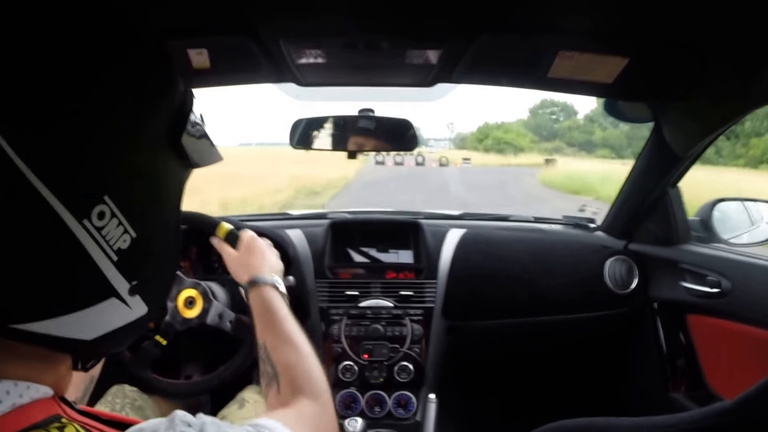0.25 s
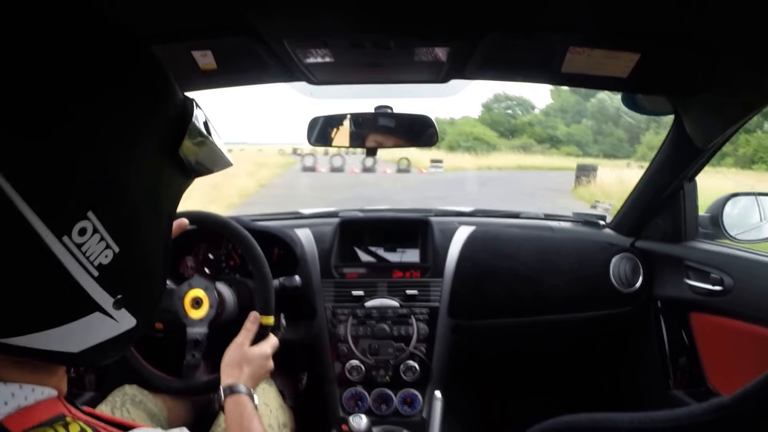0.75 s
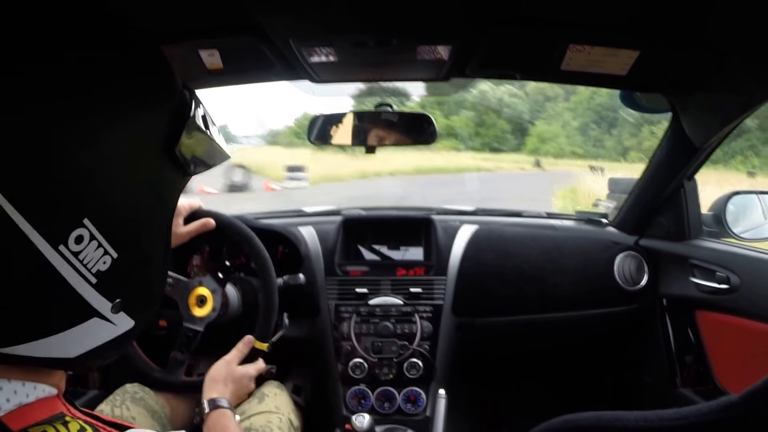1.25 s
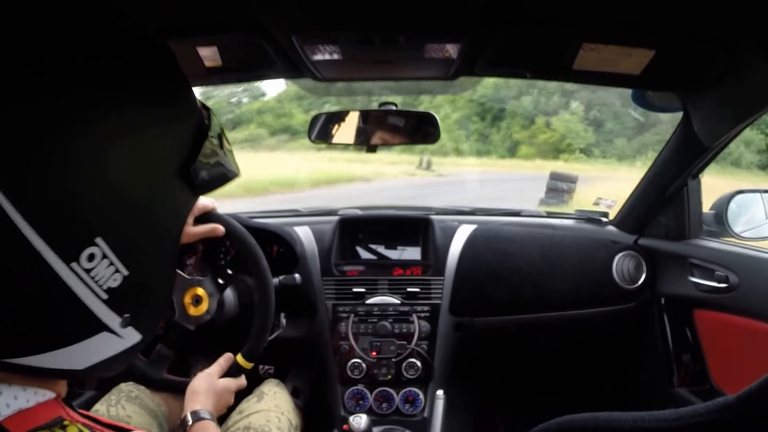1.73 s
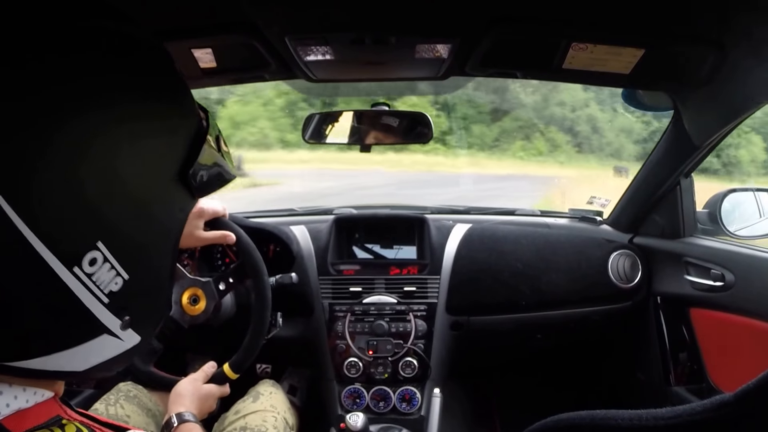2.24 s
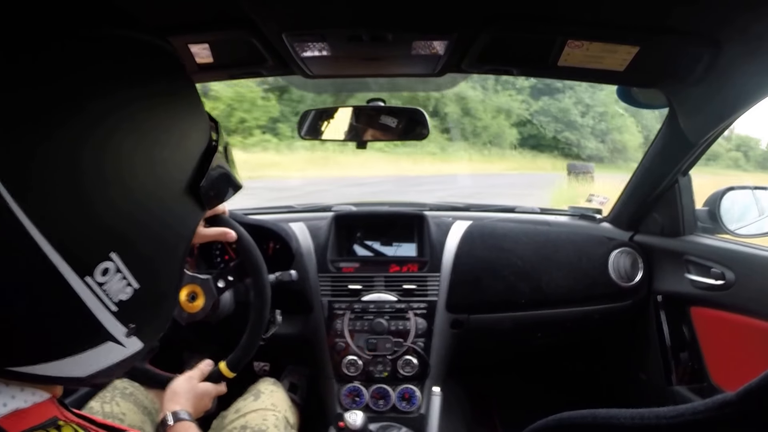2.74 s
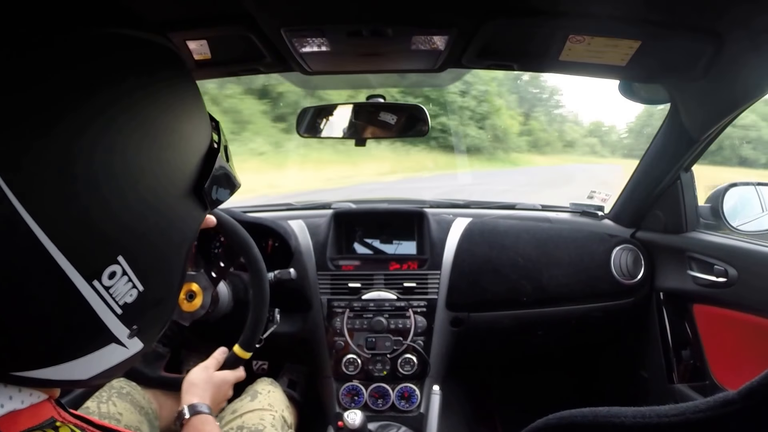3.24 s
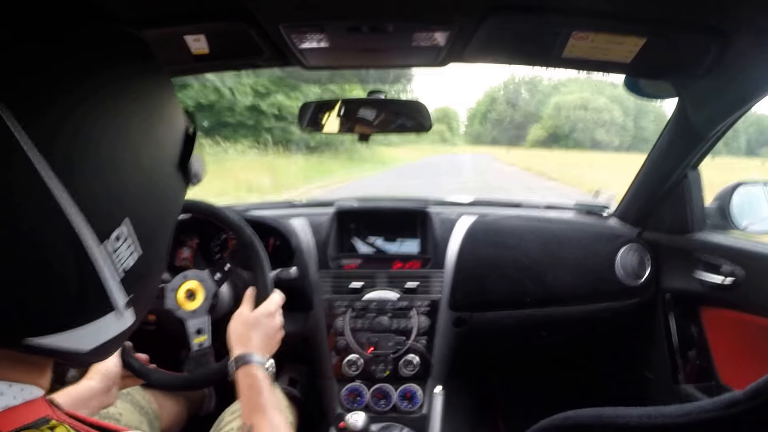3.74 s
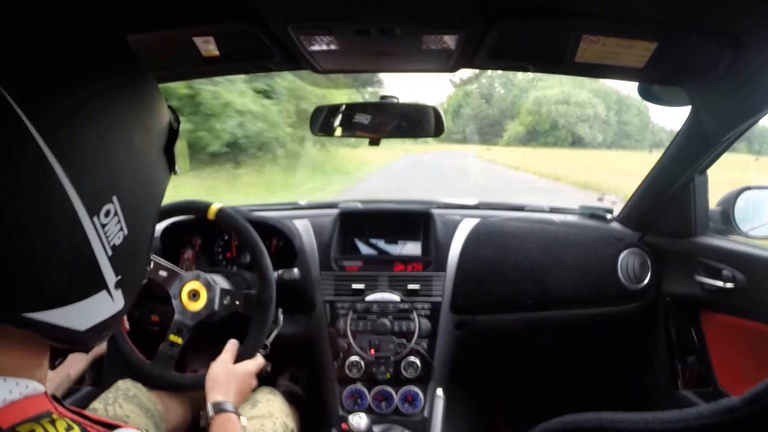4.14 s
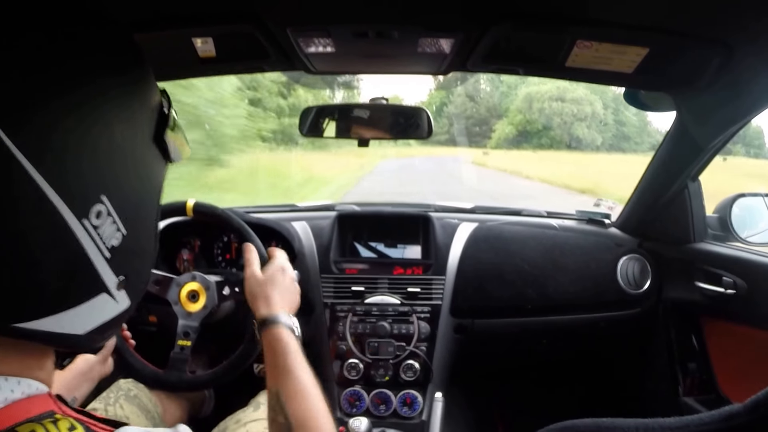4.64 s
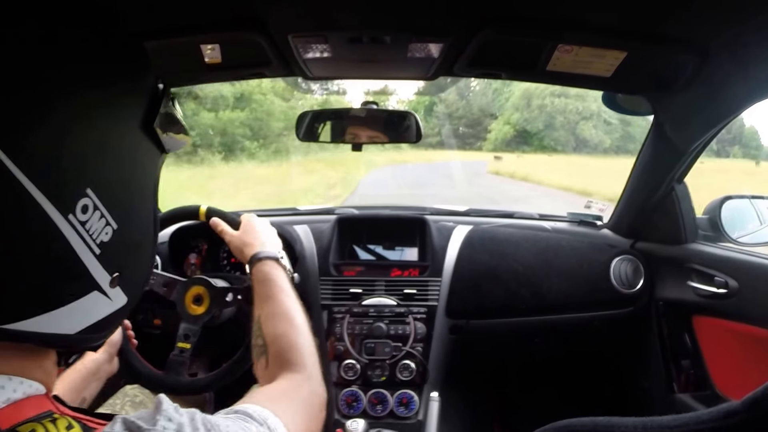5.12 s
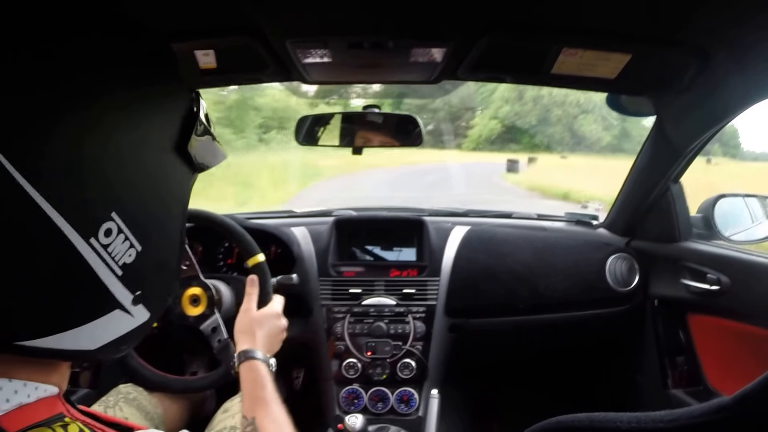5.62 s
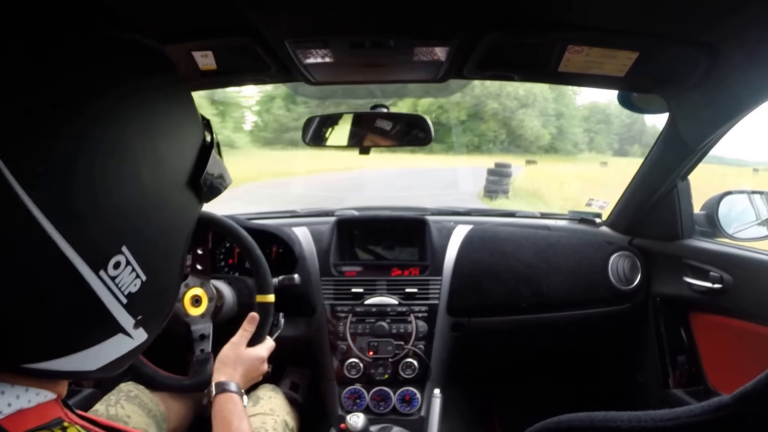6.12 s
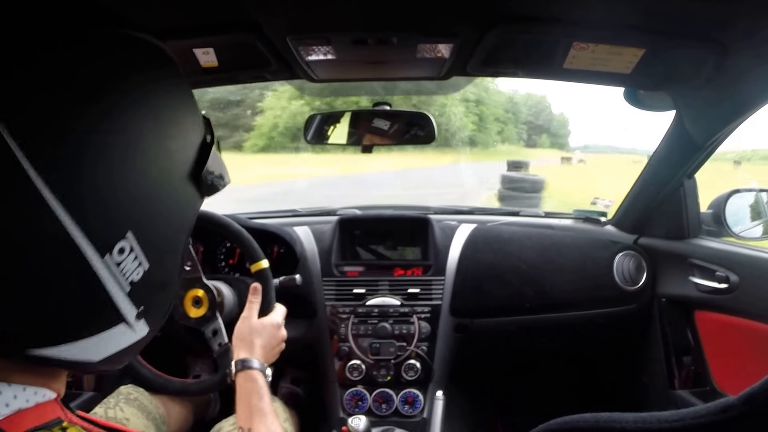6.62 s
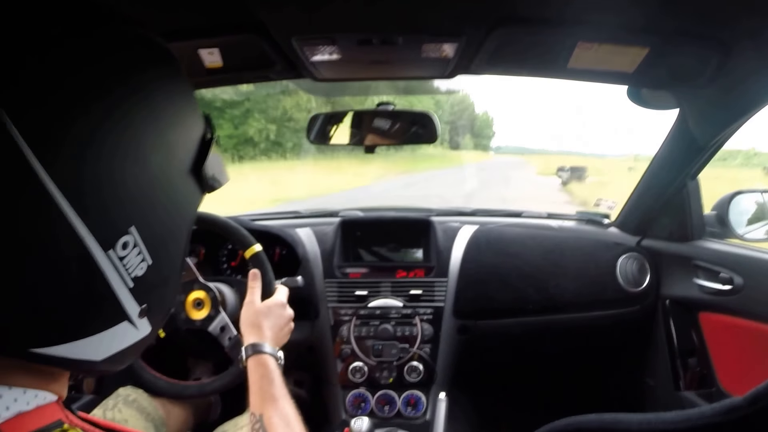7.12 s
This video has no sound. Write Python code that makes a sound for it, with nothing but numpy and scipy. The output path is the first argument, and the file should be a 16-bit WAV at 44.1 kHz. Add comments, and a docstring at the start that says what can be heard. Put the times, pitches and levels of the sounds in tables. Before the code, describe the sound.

Inside a car on a track, a smooth, buzzing engine drone sinks slightly and burbles through a corner while a loose part knocks and plastic trim rattles. The engine then pulls hard with rushing intake air, drops briefly at a thin whistle, knocks again, and climbs once more. Low road rumble and tyre roar continue throughout, heard from a microphone in the small, dry cabin.

```python
"""Inside a rotary-engined car on a circuit: it rolls through a corner on part throttle, pulls hard,
lifts briefly and pulls again. The exhaust is a stack of sine orders of the firing rate, filtered by pipe
and cabin; the intake is puffing noise. Road rumble and tyre roar are coloured noise, thuds are short sines.
Something loose knocks at the turns of the wheel as decaying modes; trim rattles in noise bursts and squeaks."""
import sys
import numpy as np
from scipy import signal
from scipy.fft import rfft, irfft, next_fast_len
from scipy.io import wavfile
from scipy.ndimage import map_coordinates

SR = 44100
rng = np.random.default_rng(int(sys.argv[2]) if len(sys.argv) > 2 else 0)


def wav_out(sig):
    """Save sig, one row per channel (or a flat mono array), as 16-bit PCM at SR to the path in sys.argv[1]."""
    wavfile.write(sys.argv[1], SR, np.round(np.clip(np.atleast_2d(sig).T, -1, 1) * 32767).astype(np.int16))


N = 325017


def amp(db):
    """Decibels to gain."""
    return 10 ** (np.asarray(db) / 20)


def unit(x):
    """Scale to rms 1."""
    return x / np.sqrt(np.mean(x ** 2) + 1e-20)


def along(points, hz):
    """Read (frequency [Hz], value) points on a log frequency axis."""
    f, v = np.transpose(points)
    return np.interp(np.log(hz + 1), np.log(f + 1), v)


def humps(peaks, hz):
    """Gain in dB of (centre [Hz], width [Hz], level [dB]) resonances."""
    return sum(db / (1 + (2 * (hz - centre) / width) ** 2) for centre, width, db in peaks)


def curves(rows):
    """One value per sample for each column after the time."""
    s, *cols = np.transpose(rows)
    return [np.interp(np.arange(N) / SR, s, c) for c in cols]


def held(start, end, rise, fall):
    """An envelope from 0 to 1 that rises at start and falls at end, all in seconds."""
    t = np.arange(N) / SR
    return np.clip((t - start) / rise, 0, 1) * np.clip(1 - (t - end) / fall, 0, 1)


def swells(rows, length):
    """A curve in dB with a short rounded peak for each (time [s], level [dB]) row."""
    t = np.arange(N) / SR
    return sum(db * np.exp(-((t - s) / length) ** 2) for s, db in rows)


def wobble(rate):
    """A smooth random curve, rate knots a second."""
    steps = np.arange(0, N + 32, 32)
    coarse = map_coordinates(rng.standard_normal(4096), [steps * rate / SR], mode="wrap")
    return np.interp(np.arange(N), steps, coarse)


def filtered(x, response):
    """Filter x by a gain that is a function of frequency."""
    m = next_fast_len(len(x) + 8192)
    return irfft(rfft(x, m) * response(np.fft.rfftfreq(m, 1 / SR)), m)[:len(x)]


def noise(spectrum):
    """Noise of rms 1 with the given colour."""
    return unit(filtered(rng.standard_normal(N), lambda hz: amp(along(spectrum, hz))))


def narrow(centre_hz, width):
    """Noise of rms 1 in one resonance."""
    return unit(filtered(rng.standard_normal(N), lambda hz: 1 / (1 + (2 * (hz - centre_hz) / width) ** 2)))


def add(track, s, sound):
    """Mix a short sound into the track at s seconds."""
    part = track[max(round(s * SR), 0):][:len(sound)]
    part += sound[:len(part)]


# presses of the throttle: (down [s], up [s], time to press [s], engine load [dB], throttle whine [dB])
PRESSES = [(-.1, 3.2, 0.054, -10, -73), (.08, 0.332, 0.31, -2.5, -72), (1.078, 1.19, 0.13, 5, -42),
           (1.2, 1.7, 0.049, -6, -68), (2.2, 2.74, 0.11, -3.5, -58), (2.8, 5.24, 0.31, 0.5, -57.5),
           (6.018, 7.41, 0.075, -0.54, -64)]
COAST_DB, COAST_WHINE_DB = -14.5, -81  # load and whine with the throttle shut


def throttle(release):
    """Engine load and throttle whine in dB; both rise with each press and fall over release seconds."""
    load_db, whine_db = COAST_DB, COAST_WHINE_DB
    for down, up, rise, press_db, sing_db in PRESSES:
        pedal = held(down, up, rise, release)
        load_db = np.maximum(load_db, COAST_DB + pedal * (press_db - COAST_DB))
        whine_db = np.maximum(whine_db, COAST_WHINE_DB + pedal * (sing_db - COAST_WHINE_DB))
    return load_db, whine_db


# upper orders as they reach the cabin: (frequency [Hz], level [dB])
PIPE = [(280, 1.5), (450, -3), (620, -0.5), (770, -5.5), (860, -6), (1000, -8), (1150, -9), (1280, -17.5),
        (1400, -17), (1650, -18.5), (1850, -25), (2200, -19.5), (3600, -49)]
# lines halfway between the orders, relative to them: (frequency [Hz], level [dB])
HALFWAY = [(540, -9), (600, -5), (660, -11), (780, -13), (900, -8), (1380, -4.5), (1520, -7), (1750, -4.5)]
# narrow cabin resonances that the upper orders sweep through: (centre [Hz], width [Hz], level [dB])
CABIN_PEAKS = [(601, 34, 8), (687, 17, 3.5), (703, 18, -4), (753.5, 16, 7.5), (798.8, 14, 7.5),
               (840, 23, -6), (900, 38, 1), (1040, 28, -1), (1060, 30, 2.5), (1122, 15, 1), (1206, 74, 6.5),
               (1396, 40, 1.5), (1510, 49, 8.5), (1592, 55, 7.5), (1735, 40, 0)]
# the lowest note drops and breaks up partway through the first pull:
# (start [s], end [s], onset [s], recovery [s])
FALTER = (3.59, 4.08, 0.022, 0.17)
FALTER_DB = -2


def exhaust(firing_hz, phase, boom_db, second_db, rasp_db):
    """Orders of the firing rate; the two rotors fire unequally, which puts lines halfway between them."""
    # on a light throttle the chambers burn unevenly and the note stumbles
    stumble = np.clip((-41 - rasp_db) / 7, 0, 1)
    phase = phase + (0.04 + 0.22 * stumble) * wobble(24)

    falter = held(*FALTER)
    flutter_db = (0.8 + 2 * stumble + 2.5 * falter) * wobble(30)
    note = amp(boom_db + FALTER_DB * falter + flutter_db) * np.sin(phase + 1.1 * falter * wobble(32))
    note += amp(second_db + 2 * wobble(24)) * np.sin(2 * phase + 0.22 * wobble(25))

    rasp = np.zeros(N)
    for order in [1.5, *np.arange(2.5, 12.5, 0.5)]:
        hz = order * firing_hz
        path_db = along(PIPE, hz) + humps(CABIN_PEAKS, hz)
        # the halfway lines are weak, except as they pass a pipe resonance
        unequal_db = (order % 1 > 0) * along(HALFWAY, hz)
        # each order swells and flutters with the combustion
        swell_db = 1.8 * wobble(6) + 2.4 * wobble(16) + 1.1 * wobble(60)
        waver = 0.24 * wobble(16) + 0.08 * wobble(70)
        tone = np.sin(order * phase + waver + rng.uniform(0, 2 * np.pi))
        rasp += amp(path_db + unequal_db + swell_db) * tone
    # a rotor has three faces, so the pattern of strong and weak firings repeats every six
    faces = 1 + 0.16 * wobble(4) * np.sin(phase / 6) + 0.22 * wobble(4) * np.sin(phase / 3)
    return np.sqrt(2) * (note + amp(rasp_db) * rasp * faces)


# part throttle through the corner: (start [s], end [s], rise [s], fall [s])
BURBLE = (0.7, 3.2, 0.84, 0.31)
# levels of orders 0.5, 1.5 and 2 before the throttle scales them: (level [dB], one per order)
BURBLE_DB = (-28.5, -33.5, -37.5)


def burble(phase, load_db):
    """On part throttle the two rotors burn unequally and throb around the low orders."""
    throb = np.zeros(N)
    for order, db in zip((0.5, 1.5, 2), BURBLE_DB):
        throb += amp(db + 3.5 * wobble(16)) * np.sin(order * phase + 0.45 * wobble(16))
    light = np.clip(load_db / COAST_DB, 0.3, 1) * held(*BURBLE)
    return light * throb


# colour of the exhaust turbulence: (frequency [Hz], level per Hz [dB])
GAS = [(350, -11), (700, -4), (1250, -4.5), (1600, -10.5), (2400, -18), (5000, -33)]
GAS_DB = -9  # relative to the upper orders


def combustion(phase, rasp_db):
    """Turbulent gas leaves the ports in rough puffs around the upper orders."""
    beat = 1 + 0.8 * np.sin(phase) + 0.5 * np.sin(phase / 2)
    puffs = unit(beat * amp(2 * wobble(60)))
    return amp(rasp_db + GAS_DB) * puffs * noise(GAS)


# colour of the rushing air: (frequency [Hz], level per Hz [dB])
INTAKE = [(400, 14.5), (1200, 2), (2200, 6.5), (3300, 5.5), (4700, 4), (5800, 5), (6500, 1.5), (8200, -1.5),
          (10200, -1.5), (12000, -6.5), (15000, -19)]
# resonances and notches of the intake duct: (centre [Hz], width [Hz], level [dB])
DUCT = [(3705, 120, 2.5), (4294, 100, 3.5), (5260, 120, 0.5), (6050, 250, -4), (7550, 200, 4.5),
        (8950, 400, 0.5), (9450, 300, 3), (10500, 500, 1.5)]


def intake(phase, rush_db):
    """Air rushes in puffs, one for each firing; a stronger flow is brighter."""
    puffs = unit(1 + 0.065 * np.sin(phase) + 0.14 * np.sin(phase / 2))
    air = unit(filtered(noise(INTAKE), lambda hz: amp(humps(DUCT, hz))))
    # a weak flow loses part of its treble
    fizz = filtered(air, lambda hz: along([(7000, 0.69), (13000, 0.55)], hz))
    dullness = np.clip((-37 - rush_db) / 20, 0, 0.8)
    return amp(rush_db + 0.17 * wobble(25)) * puffs * (air - dullness * fizz)


SPELL_EDGE_S = 0.023


def spells(rows):
    """A gain that opens for each (start [s], end [s], level [dB]) row."""
    return sum(amp(db) * held(start, end, SPELL_EDGE_S, SPELL_EDGE_S) for start, end, db in rows)


MID_RATE_HZ = 243.3  # the firing rate around which levels and whine pitch are set
WHINE_HZ, WHINE_CLIMB = 6390, 0.62  # pitch at the mid rate; the power of engine speed by which it climbs
# spells of a hoarse grinding: (start [s], end [s], level [dB])
GRINDS = [(1.17, 3.1, -57.5), (2.1, 2.4, -65)]
# spells of a thin squeal in the corner: (start [s], end [s], level [dB])
SQUEALS = [(1.17, 1.72, -61), (1.29, 1.37, -63), (1.93, 2.68, -59)]
# spells of a high sizzle: (start [s], end [s], level [dB])
SIZZLES = [(1.05, 9.4, -73), (1.28, 1.35, -73), (1.66, 2.24, -72)]


def whines(firing_hz, whine_db):
    """Air whines past the throttle, higher with engine speed; grind, squeal and sizzle are narrow noise."""
    turn = 2 * np.pi * np.cumsum(WHINE_HZ * (firing_hz / MID_RATE_HZ) ** WHINE_CLIMB) / SR
    # two randomly swelling halves make the tone hoarse
    whine = wobble(520) * np.sin(turn + wobble(300))
    whine += wobble(520) * np.cos(turn + wobble(300))
    grind = narrow(centre_hz=2600, width=320)
    squeal = amp(1.5 * wobble(12) + 2 * wobble(40)) * narrow(centre_hz=5080, width=320)
    sizzle = amp(wobble(14) + 1.8 * wobble(50)) * narrow(centre_hz=10470, width=430)
    corner = spells(GRINDS) * grind + spells(SQUEALS) * squeal
    return amp(whine_db) * whine + corner + spells(SIZZLES) * sizzle


def lift_whistle(start, hold, pitch_hz, first_db):
    """A thin, breaking whistle of air as the throttle shuts, on its first and third partials."""
    t = np.arange(N) / SR - start
    breaking = (0.18 + 0.4 * np.exp(-np.abs(t) / 0.03)) * wobble(500)
    turn = 2 * np.pi * pitch_hz * t + breaking
    tone = np.sin(3 * turn) + amp(first_db) * np.sin(turn)
    # after the hold it dies at 148 dB a second
    return (t > 0) * amp(-47.5 - 148 * np.maximum(t - hold, 0) + 2 * wobble(200)) * tone


# a loose part knocking and falling back: (time [s], level [dB])
KNOCKS = [(0.4056, -28), (0.527, -25), (0.6716, -23), (.7698, -14.5), (0.8072, -23.5), (0.976, -17.5),
          (1.01, -21.5), (1.145, -23), (1.462, -23), (1.483, -25.5), (1.805, -30), (5.59, -21),
          (5.8255, -17), (5.852, -26), (5.868, -32), (5.9998, -16.5), (6.02, -22.5), (6.178, -15.5),
          (6.193, -25), (6.212, -39)]
# its well damped modes: (frequency [Hz], level [dB], t60 [s])
KNOCK_MODES = [(816, -11, 0.066), (1050, -1, 0.012), (1220, -2.5, 0.045), (1323, -2, 0.04),
               (1600, -9, 0.016), (1820, -10, 0.017), (2660, -17, 0.033), (3350, -16, 0.024),
               (3570, -28, 0.015), (4780, -25, .015)]
# colour of the trim, for scrapes and rattles: (frequency [Hz], level per Hz [dB])
TRIM = [(300, 16), (900, 13.5), (1700, 10), (2300, 11), (3300, 6.5), (5500, 3), (7500, -2.5),
        (11500, -10.5), (15000, -21)]
# colour of the rough clack: (frequency [Hz], level per Hz [dB])
CLACK = [(300, -16), (780, 9), (1300, 19), (1750, 11), (2300, 2), (3200, -8), (5500, -22), (9000, -31),
         (15000, -42)]
TOUCH_S, TOUCH_DB = 0.0059, -8  # the part touches lightly just before each blow
SCRAPE_DB, SCRAPE_T60_S = -20, 0.076  # the scrape of that touch, relative to the knock
CLACK_DB, CLACK_T60_S = -10, 0.12  # the rough tail of the blow, relative to the knock


def knocks():
    """A light scraping touch, then the blow proper, rings the loose part; a rough clack dies away after it."""
    out, t = np.zeros(N), np.arange(SR // 8) / SR
    for s, db in KNOCKS:
        for lead, share_db in ((TOUCH_S, TOUCH_DB), (0.0011, 0)):
            # each contact detunes the modes and varies their levels in dB
            chance = rng.standard_normal((len(KNOCK_MODES), 2)) * [0.008, 1.3]
            ring = np.zeros(len(t))
            for k, ((hz, level, t60), (detune, vary)) in enumerate(zip(KNOCK_MODES, chance)):
                decay = amp(level + vary - 60 * t / t60)
                ring += (-1) ** k * decay * np.sin(2 * np.pi * hz * (1 + detune) * t)
            add(out, s - lead, amp(db + share_db) * ring)
        scrape = unit(filtered(rng.standard_normal(len(t)), lambda hz: amp(along(TRIM, hz))))
        clack = unit(filtered(rng.standard_normal(len(t)), lambda hz: amp(along(CLACK, hz))))
        add(out, s - TOUCH_S, amp(db + SCRAPE_DB - 60 * t / SCRAPE_T60_S) * scrape)
        # the tail builds up as the first ring fades
        build_up = 1 - np.exp(-t / 0.0024)
        add(out, s, amp(db + CLACK_DB - 60 * t / CLACK_T60_S) * build_up * clack)
    return out


CHATTER_UNTIL_S = 2.3
# every rattle plays 5.5 dB above its listed level, before its decay
CHATTER_DB, CHATTER_TOP_DB, CHATTER_T60_S = -61, 7, 0.07


def faint_rattles(count):
    """Small rattles at chance moments while the car turns into the corner."""
    times = (np.arange(count) + rng.random(count)) * CHATTER_UNTIL_S / count
    return [(s, CHATTER_DB, CHATTER_TOP_DB, CHATTER_T60_S) for s in times]


# trim rattles: (time [s], level before the 5.5 dB lift [dB], top end [dB], t60 [s])
RATTLES = [(.03, -37, -11, 0.1), (.119, -36, -35, 0.089), (.19, -35.5, 4, 0.045), (.281, -28, -22, 0.032),
           (.344, -32, -12, 0.05), (.36, -33.5, 2, 0.11), (.375, -21, 5, 0.06), (.386, -26, -4, 0.043),
           (.529, -27, 6, 0.061), (.561, -42, -1, .05), (.583, -31, 6, 0.053), (.857, -38, -15, .08),
           (1.021, -41, 9, 0.34), (1.067, -31, -5, 0.16), (1.26, -39, 7, 0.058), (1.467, -29.5, 24, 0.024),
           (1.469, -29, -19, 0.058), (1.719, -41.5, 10, 0.074), (1.911, -37, -1, .02),
           (5.37, -31.5, 2, 0.073), (5.489, -37, 14, .031), (5.587, -34, -15, .08),
           (5.605, -35, -11, 0.086), (5.656, -38, 8, 0.07)]


def rattles():
    """Plastic trim chatters in short bursts of tiny contacts."""
    out, t = np.zeros(N), np.arange(SR // 6) / SR
    for s, db, top_db, t60 in [*RATTLES, *faint_rattles(count=5)]:
        contacts = rng.standard_normal(len(t)) * amp(3.2 * rng.standard_normal(len(t)))

        def colour(hz):
            """The trim's spectrum, tilted by this rattle's top end."""
            tilt = along([(3000, 0.041), (9000, 0.3), (12000, 1.0)], hz)
            return amp(along(TRIM, hz) + top_db * tilt)

        chatter = unit(amp(2 * wobble(350)[:len(t)]))
        rise = 1 - np.exp(-45 * t / t60)
        burst = rise * chatter * unit(filtered(contacts, colour))
        add(out, s, amp(db + 5.5 - 60 * t / t60) * burst)
    return out


# trim squeaks, each a double chirp as the part rubs to and fro: (time [s], peak level [dB])
SQUEAKS = [(1.577, -38.5), (2.492, -41), (2.639, -39.5), (3.185, -47), (3.785, -41), (5.494, -38)]
RUB_BACK_S = 0.031


def squeaks(pitch_hz, length, rough):
    """Trim rubs in brief, scratchy, swelling chirps."""
    out, t = np.zeros(N), np.arange(-SR // 50, SR // 50) / SR
    back = [(s + RUB_BACK_S, db) for s, db in SQUEAKS]
    for s, db in [*SQUEAKS, *back]:
        turn = 2 * np.pi * pitch_hz * t + rough * wobble(420)[:len(t)]
        add(out, s + t[0], amp(db) * np.exp(-(t / length) ** 2) * np.sin(turn))
    return out


# the asphalt under the tyres: (time [s], coarseness [dB], unevenness [dB])
SURFACE = [(0, -2, -1.5), (.42, -3, -7.5), (.8, 2, -0.5), (1.25, 2, -2), (1.75, -1.5, 1), (1.95, -3, -4),
           (2.62, 3, 1.5), (2.8, -4, -2), (3.1, -0.5, 1.5), (3.6, -2.5, 3), (4.35, -2.5, -3.5),
           (4.56, -9, -5), (4.8, -7, 0.5), (5.3, -2.5, 1.5), (5.9, 1, 0), (6.35, -1, -1.5), (6.9, 0.5, 2.5),
           (7.37, -1.5, -2)]
# colours of body shake, tyre drone and tyre roar: (frequency [Hz], level per Hz [dB])
SHAKE = [(12, -7), (21, -5), (32, 3.5), (44, -3.5), (56, -2), (72, -12.5), (110, -14.5), (250, -99)]
DRONE = [(50, -20.5), (78, -4), (96, 5.5), (116, -5.5), (160, -4.5), (205, -6.5), (255, -9), (295, -5.5),
         (345, -18.5), (420, -15.5), (600, -36), (1500, -64.5)]
ROAR = [(150, 0), (350, 6), (520, 4.5), (720, 0), (900, 0), (1150, -5), (1550, -6.5), (1900, -13.5),
        (2700, -17), (4000, -20), (6000, -25), (10000, -38.5), (15000, -68)]
# bumps that jolt the body: (time [s], level over the steady shake [dB])
BUMPS = [(.03, 7), (2.28, 5), (2.69, 8.5), (4.34, 7.5), (6.14, 5)]
# air ringing in the tyres and the body panels: (centre [Hz], width [Hz], level [dB])
TYRE_MODES = [(153, 48, 1.5), (215.8, 23, 1), (244, 20, -11), (290, 32, -13)]
# the long corner: (turn-in [s], straightening [s], build-up [s], unwinding [s])
CORNER = (0.21, 2.6, 0.46, 1.29)
SHAKE_DB, DRONE_DB, BUMP_S = -15.5, -19.5, 0.037
ROAR_DB, ROAR_DB_PER_S, ROAR_PER_SURFACE = -34.5, 0.72, 0.38  # at the start; growth; dB per dB of coarseness
SCRUB_DB, STRAIGHT_SCRUB_DB = -27, -38


def road():
    """Bumps shake the body; the tyres drone and roar on the asphalt and ring as they scrub in the corner."""
    t = np.arange(N) / SR
    surface_db, shake_db = curves(SURFACE)
    shake = amp(SHAKE_DB + shake_db + swells(BUMPS, BUMP_S)) * noise(SHAKE)
    drone = amp(DRONE_DB + surface_db + 1.44 * wobble(13)) * noise(DRONE)
    roar_db = ROAR_DB + ROAR_DB_PER_S * t + ROAR_PER_SURFACE * surface_db
    roar = amp(roar_db + 1.2 * wobble(14)) * noise(ROAR)
    scrub_db = STRAIGHT_SCRUB_DB + (SCRUB_DB - STRAIGHT_SCRUB_DB) * held(*CORNER)
    scrub = amp(scrub_db) * sum(amp(db) * narrow(hz, width) for hz, width, db in TYRE_MODES)
    return shake + drone + scrub + roar


# thuds of the road: (time [s], half length [s], peak level [dB])
THUDS = [(1.043, .025, -13), (1.303, 0.022, -10), (1.758, 0.04, -12.5)]


def thuds(pitch_hz):
    """Ridges in the asphalt make the air in the cabin boom briefly."""
    t, out = np.arange(N) / SR, np.zeros(N)
    for s, length, db in THUDS:
        boom = np.sin(2 * np.pi * (pitch_hz * t + rng.random()))
        out += amp(db) * np.exp(-((t - s) / length) ** 2) * boom
    return out


def cabin(x, count, wet):
    """Glass and panels return many weak copies within a few hundredths of a second."""
    delays = rng.uniform(0.001, 0.03, count)
    walls = np.zeros(SR // 30)
    walls[(delays * SR).astype(int)] = rng.choice([-1, 1], count) * np.exp(-delays / 0.0084)
    walls *= wet / np.linalg.norm(walls)
    walls[0] = 1  # the direct sound
    return signal.fftconvolve(x, walls / np.linalg.norm(walls))[:N]


# engine speed: (time [s], firing rate [Hz])
SPEED = [(0, 221), (.28, 223), (.5, 202.9), (.7, 197.6), (1.3, 190.7), (2.2, 187.1), (2.5, 193.8),
         (2.9, 195), (3.42, 207.6), (3.65, 218.8), (3.85, 222.4), (4.05, 222.7), (4.18, 227.6),
         (4.3, 223.1), (4.52, 231.8), (5.08, 252.1), (5.3, 253.4), (6.02, 230.1), (6.12, 248),
         (6.35, 249.7), (6.8, 264.6), (7.37, 277.4)]
# the exhaust surges as the drive takes up: (time [s], level [dB])
SURGES = [(3.53, -1), (4.27, 3), (6.14, 2)]
# standing waves of the cabin that swell or cancel the two lowest orders:
# (centre [Hz], width [Hz], level [dB])
STANDING_WAVES = [(199.6, 7, -4.5), (212.2, 10.4, 5), (220.5, 11, -4), (237.2, 2.6, 3.5), (259, 3.9, -3),
                  (271.5, 2.7, 4), (440, 14, 6), (442, 5.8, -8), (468.6, 15, 6), (493, 29, 7),
                  (513.4, 17, -18.5), (555, 34, 9.5), (551.7, 6.2, -15)]
# the intake draws hardest here: (firing rate [Hz], width [Hz], level [dB])
INTAKE_TUNING = (239.6, 33.5, 7.35)
SURGE_S = 0.041
RELEASE_S, AIR_RELEASE_S = 0.11, 0.18  # after a lift the exhaust drops quickly, the intake air more slowly
BOOM_DB, SECOND_DB, RASP_DB = -17, -33, -35.5  # firing order, its octave and the upper orders at 0 dB load
RASP_PER_LOAD, RUSH_PER_LOAD = 1.21, 0.79  # dB for each dB of load
RUSH_DB = -45.5  # intake rush at 0 dB load
RASP_DB_PER_OCT, RUSH_DB_PER_OCT, WHINE_DB_PER_OCT = 16.5, 18.5, 23  # growth with engine speed


def scene():
    """Engine, road and loose parts together; engine speed and throttle drive the engine layers."""
    firing_hz, = curves(SPEED)
    load_db, _ = throttle(RELEASE_S)
    air_db, whine_db = throttle(AIR_RELEASE_S)
    octaves = np.log2(firing_hz / MID_RATE_HZ)

    drive_db = load_db + swells(SURGES, SURGE_S)
    boom_db = BOOM_DB + drive_db + humps(STANDING_WAVES, firing_hz)
    second_db = SECOND_DB + drive_db + humps(STANDING_WAVES, 2 * firing_hz)
    rasp_db = RASP_DB + RASP_PER_LOAD * drive_db + RASP_DB_PER_OCT * octaves
    draw_db = humps([INTAKE_TUNING], firing_hz)
    rush_db = RUSH_DB + RUSH_PER_LOAD * air_db + RUSH_DB_PER_OCT * octaves + draw_db

    phase = 2 * np.pi * np.cumsum(firing_hz * (1 + 0.0018 * wobble(22))) / SR
    engine = exhaust(firing_hz, phase, boom_db, second_db, rasp_db)
    engine += burble(phase, load_db) + combustion(phase, rasp_db)
    engine += cabin(intake(phase, rush_db), count=40, wet=0.38)
    engine += whines(firing_hz, whine_db + WHINE_DB_PER_OCT * octaves + draw_db)
    whistle = lift_whistle(start=5.381, hold=0.036, pitch_hz=3970, first_db=0)

    loose = cabin(knocks() + rattles(), count=30, wet=0.22)
    chirps = squeaks(pitch_hz=5300, length=0.006, rough=0.86)
    return (engine + whistle + loose + chirps + road() + thuds(pitch_hz=98.8))[None]


TOP_HZ = 15500


def record(dry):
    """Round off the highest peaks and keep nothing above the band limit."""
    ceiling = 0.9
    rounded = dry / (1 + np.abs(dry / ceiling) ** 10) ** (1 / 10)
    return np.array([filtered(channel, lambda hz: hz < TOP_HZ) for channel in rounded])


dry = scene()
out = record(dry)
wav_out(out)
```